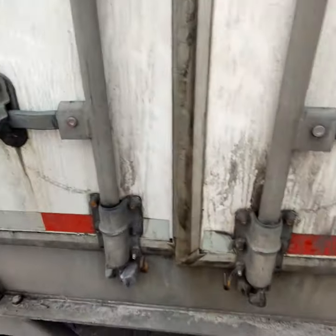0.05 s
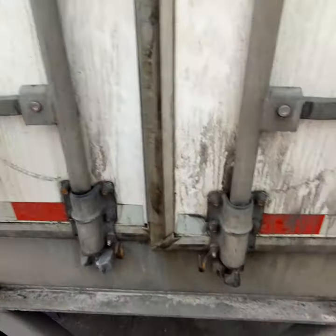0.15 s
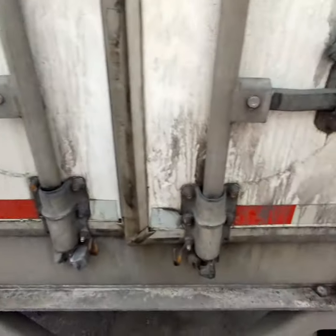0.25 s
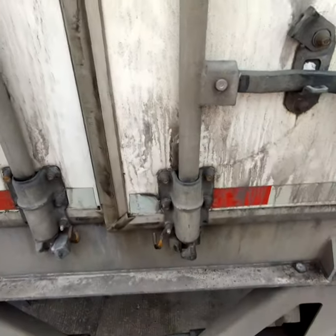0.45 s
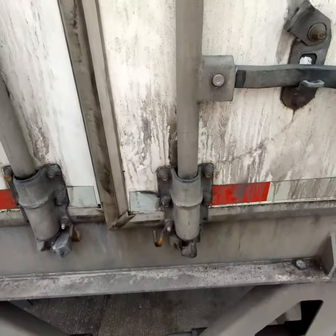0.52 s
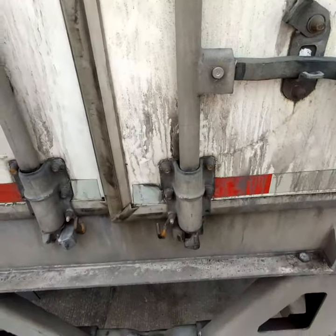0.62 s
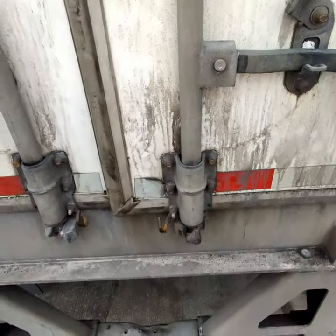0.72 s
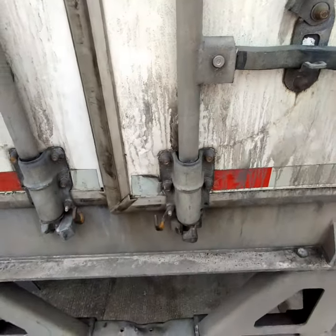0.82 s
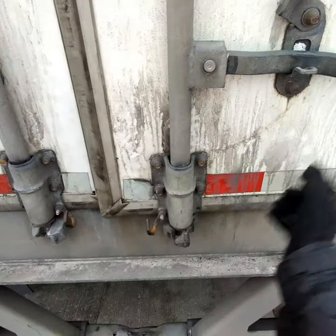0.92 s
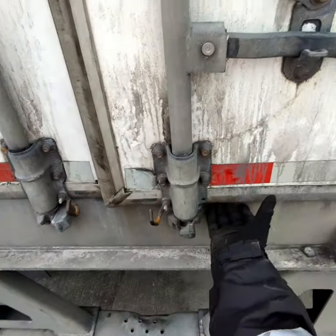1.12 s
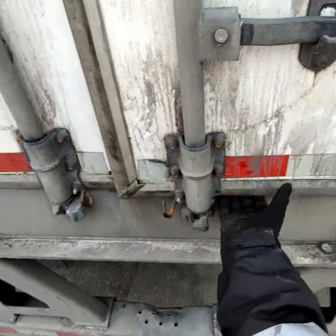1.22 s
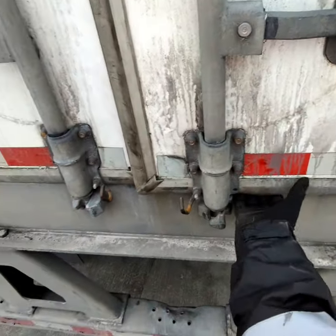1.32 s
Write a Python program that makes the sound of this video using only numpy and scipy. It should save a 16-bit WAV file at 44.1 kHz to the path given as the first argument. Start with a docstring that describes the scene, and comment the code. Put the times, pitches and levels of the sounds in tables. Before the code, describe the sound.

Steel latch hardware on a truck trailer door clanks and scrapes in two quick bursts outdoors

```python
"""Steel latch on a trailer door

Outdoors, close to a small two-port microphone, latch hardware on a trailer's rear door is knocked about.
Dull knocks ring low modes of the door and latch; clinks are short bursts of bright noise with a tone.
Dragging steel is a dense run of random clicks, and sparser clicks keep the door shuddering.
Filtered noise under it all makes the yard, the rustling jacket and a little wind.
"""
import sys
import numpy as np
from scipy import signal
from scipy.fft import rfft, irfft
from scipy.io import wavfile

SR = 44100
rng = np.random.default_rng(int(sys.argv[2]) if len(sys.argv) > 2 else 0)


def digitize_waveform(pressure):
    """Quantize a signal to 16-bit integers and store it at the path in sys.argv[1].

    Rows of a 2-D input are taken as channels; values are limited to [-1, 1].
    """
    field = np.atleast_2d(pressure).T
    bounded = np.clip(field, -1, 1)
    quanta = np.round(bounded * 32767).astype(np.int16)
    wavfile.write(sys.argv[1], SR, quanta)


def linear_from_db(decibels):
    """Turn decibels (scalar or array-like) into linear amplitude factors; 0 gives 1."""
    return 10 ** (np.asarray(decibels, float) / 20)


N = 59535
T = np.arange(N) / SR  # time of every sample [s]
HZ = np.maximum(np.fft.rfftfreq(N, 1 / SR), 1)  # frequency grid [Hz]

# In all tables, t60 is the time a ringing takes to fall by 60 dB.


def rms_one(x):
    """Scale to an average strength (rms) of 1."""
    return x / np.sqrt(np.mean(x ** 2) + 1e-20)


def level(curve):
    """Turn a table of times and levels into a gain for every sample."""
    return linear_from_db(np.interp(T, *np.transpose(curve)))


def at_hz(points, hz):
    """Read a table between its rows, on a log-frequency axis."""
    points = np.array(points)
    return np.interp(np.log(hz), np.log(points[:, 0]), points[:, 1])


def colour(x, spectrum):
    """Filter a sound by a spectrum table and scale it to rms 1."""
    return rms_one(irfft(rfft(x) * linear_from_db(at_hz(spectrum, HZ)), N))


def drift(corner_hz):
    """Slow random wandering of rms about 1: noise through two equal low-pass poles."""
    every = 40  # samples from one slow value to the next
    settle = 2000  # slow values thrown away while the filter settles
    r = np.exp(-2 * np.pi * corner_hz * every / SR)
    noise = rng.standard_normal(N // every + settle + 2)
    slow = rms_one(signal.lfilter([1], [1, -2 * r, r * r], noise)[settle:])
    return np.interp(np.arange(N) / every, np.arange(len(slow)), slow)


def fading(clicks, t60):
    """Each click starts a smooth exponential fade."""
    return signal.lfilter([1], [1, -linear_from_db(-60 / (t60 * SR))], clicks)


def ring(clicks, hz, t60):
    """A resonator: each unit click starts a dying sine of starting height 1."""
    r, w = linear_from_db(-60 / (t60 * SR)), 2 * np.pi * hz / SR
    return signal.lfilter([0, np.sin(w)], [1, -2 * r * np.cos(w), r * r], clicks + 1e-18)


def clicks_at(s, db):
    """Single-sample clicks at the given times and levels."""
    out = np.zeros(N)
    out[(np.atleast_1d(s) * SR).astype(int)] = linear_from_db(db)
    return out


def strike(s, db, modes):
    """Each blow sets all modes ringing, each mode with its own random strength."""
    strength_db = 0.8 * rng.standard_normal((len(s), len(modes)))
    out = np.zeros(N)
    for k, (hz, mode_db, t60) in enumerate(modes):
        out = out + ring(clicks_at(s, db + mode_db + strength_db[:, k]), hz, t60)
    return out


def grains(rate, spread_db):
    """Random clicks of either sign and uneven size, about rate of them per second."""
    happens = rng.random(N) < rate / SR
    sign = rng.choice([-1, 1], N)
    size = linear_from_db(spread_db * np.minimum(rng.exponential(1, N), 5))
    return happens * sign * size


def soften(x, hz):
    """A soft contact dulls a blow: two equal one-pole low-passes."""
    r = np.exp(-2 * np.pi * hz / SR)
    return signal.lfilter([(1 - r) ** 2], [1, -2 * r, r * r], x)


# how the two microphone ports differ: (frequency [Hz], left minus right [dB], left leads by [rad],
# likeness of diffuse sound in the two ports [0 to 1])
PORT_TABLE = [(100, 0, .09, .99), (700, 0, .02, .999), (1200, 0, 0, .99), (2000, -1.5, -.1, .88),
              (2600, -2, .2, .4), (3100, -1.5, 1.5, .4), (3900, -1.5, 2.6, .35), (4450, -6, 2.4, .1),
              (4900, -12, -1, .2), (5500, -11, -.5, .3), (6500, -1, -.2, .65), (7300, 4, -1.5, .5),
              (9500, 5, -1.1, .35), (11000, 10, -.7, .27), (12200, 17, -1.8, .1), (13000, 13, -3.1, .2),
              (14500, 9, -3, .2)]


def port(column):
    """One column of the port table, read on the frequency grid."""
    return at_hz(np.array(PORT_TABLE)[:, [0, column]], HZ)


def wind():
    """A little wind: lumpy low noise, made separately for each port."""
    sides = []
    for _ in "LR":
        low_noise = rms_one(soften(rng.standard_normal(N), 88))
        sides.append(linear_from_db(1.2 * drift(11.0)) * low_noise)
    return linear_from_db(-56) * np.array(sides)


# yard noise before its random drift: (time [s], level [dB])
YARD_LEVEL = [(0, -42), (.02, -53), (.11, -50.5), (.17, -45.5), (.22, -45.5), (.36, -62.5), (.55, -45.5),
              (.7, -50), (.87, -46), (.94, -48.5), (1.15, -48), (1.23, -48), (1.3, -46.5), (1.35, -46.5)]
# tone colour of the yard: (frequency [Hz], relative level per Hz [dB])
YARD_SPECTRUM = [(120, -3.5), (200, 0), (307, -6.5), (708, -4), (1120, -4), (1360, -6.5), (2170, -9.5),
                 (2350, -13.5), (3750, -20.5), (4500, -18), (5850, -39), (9900, -120)]


def yard():
    """The yard's background: filtered noise that swells and sinks."""
    return level(YARD_LEVEL) * linear_from_db(1.65 * drift(34)) * colour(rng.standard_normal(N), YARD_SPECTRUM)


# rubbing cloth before its random drift: (time [s], level [dB])
RUB_LEVEL = [(.55, -91), (.65, -54.5), (.87, -55), (.92, -73), (1.2, -60.5), (1.29, -48.5), (1.35, -48)]


def cloth_rub():
    """A rub of cloth: noise narrowed to a band near 1450 Hz by two resonators in a row."""
    noise = rng.standard_normal(N)
    for t60 in (1.7 / 240, 1.5 / 240):
        noise = ring(noise, 1450, t60)
    return level(RUB_LEVEL) * linear_from_db(2.6 * drift(17)) * rms_one(noise)


# jacket rustle before its random drift: (time [s], level [dB])
RUSTLE_LEVEL = [(0, -58.5), (.18, -57), (.36, -60), (.6, -58.5), (.72, -61), (.85, -55), (.95, -51),
                (1.07, -51.5), (1.13, -54), (1.19, -47.5), (1.24, -51), (1.29, -55.5), (1.35, -57)]
# tone colour of the rustle: (frequency [Hz], relative level per Hz [dB])
RUSTLE_SPECTRUM = [(1760, -46), (3000, -37), (3870, -16), (5350, -6.5), (5880, 0), (9110, 1), (12900, 7),
                   (14350, 5.5), (14550, -60)]


def jacket_rustle():
    """Jacket cloth rustles: bright filtered noise with a wandering level."""
    return level(RUSTLE_LEVEL) * linear_from_db(2.3 * drift(20)) * colour(rng.standard_normal(N), RUSTLE_SPECTRUM)


# tone colour of the sleeve swish: (frequency [Hz], relative level per Hz [dB])
SWISH_SPECTRUM = [(1760, -1), (3000, -7), (3940, -39), (4730, -8), (5200, -12), (5680, -10.5), (13000, -2),
                  (14350, -15), (14600, -70)]


def sleeve_swish():
    """One brisk swish of the sleeve: noise that swells and fades as a bell curve."""
    centre_s, half_s = 1.263, 0.023  # half_s: from the peak down to 1/e
    swell = np.exp(-((T - centre_s) / half_s) ** 2)
    return linear_from_db(-43) * swell * colour(rng.standard_normal(N), SWISH_SPECTRUM)


def background():
    """Yard and cloth sounds; two separate draws, mixed as mid and side, make the ports partly unlike."""
    def one():
        """One draw of all the background sounds."""
        return yard() + cloth_rub() + jacket_rustle() + sleeve_swish()

    likeness = port(3)
    mid = rfft(one()) * np.sqrt((1 + likeness) / 2)
    side = rfft(one()) * np.sqrt((1 - likeness) / 2)
    return irfft(np.array([mid + side, mid - side]), N)


# the door shuddering: (time [s], level [dB])
RUMBLE_LEVEL = [(0, -41.5), (.1, -42.5), (.17, -39), (.215, -36), (.26, -19), (.3, -32), (.33, -29.5),
                (.37, -36), (.4, -25.5), (.44, -31), (.49, -28.5), (.53, -20), (.58, -36.5), (.75, -36.5),
                (.9, -41), (1.0, -44.5), (1.08, -43.5), (1.15, -53), (1.24, -48.5), (1.29, -40),
                (1.35, -49)]
# tone colour of the shudder: (frequency [Hz], relative level per Hz [dB])
RUMBLE_SPECTRUM = [(15, -38), (25, 2), (81, 2.5), (105, -2), (181, -5.5), (367, -17.5), (425, -13),
                   (479, -33), (600, -17.5), (780, -87)]


def rumble():
    """Small uneven jolts, about 400 per second, keep the door panel shuddering."""
    return level(RUMBLE_LEVEL) * colour(grains(400, spread_db=2.0), RUMBLE_SPECTRUM)


# soft bumps of the door, before softening: (time [s], panel level [dB], bracket level [dB])
JOLT_TIMES = [(.399, -39, -28), (0.475, -22, -40), (0.544, -43, -25.5), (0.61, -20.5, -33.5),
              (0.646, -17.5, -64), (0.669, -19.5, -53), (0.696, -20, -44), (0.708, -23, -54),
              (0.755, -19.5, -49), (0.782, -13, -31), (0.804, -28, -56), (0.843, -19.5, -54),
              (1.031, -24, -47), (1.035, -51, -26.5), (1.045, -36, -28.5), (1.102, -26.5, -45),
              (1.282, -29, -63)]
# ringing of the door panel, also used by knocks(): (frequency [Hz], relative level [dB], t60 [s])
PANEL_RINGING = [(101, -13, 0.07), (168, -5, 0.036)]
# ringing of the bracket, also used by knocks(): (frequency [Hz], relative level [dB], t60 [s])
BRACKET_RINGING = [(228, -1, 0.05), (325, 1, 0.035), (428, -4, 0.035)]


def jolts():
    """Soft bumps that reach only the low modes of panel and bracket."""
    s, panel_db, bracket_db = np.transpose(JOLT_TIMES)
    bumps = strike(s, panel_db, PANEL_RINGING) + strike(s, bracket_db, BRACKET_RINGING)
    return soften(bumps, 333)


def scatter(x):
    """Nearby surfaces scatter mostly treble: short noisy echoes, opposite in the two ports."""
    tail_t60 = 0.016  # s
    tail = rng.standard_normal(N) * linear_from_db(-60 * T / tail_t60)
    tail = tail / np.sqrt(np.sum(tail ** 2))
    # the less alike the ports are at a frequency, the more is scattered
    side = irfft(rfft(x * drift(62)) * rfft(tail) * np.sqrt(1 - port(3)), N)
    return linear_from_db(-5) * side * [[1], [-1]]


# a small free part singing: (time struck [s], starting level [dB], time touched [s])
SING_TIMES = [(.2765, -41, 0.48), (.457, -47, 0.66)]


def sing():
    """A small free part gives a thin pure ring until a touch quickly damps it."""
    hz, t60, touch_s = 9362, 0.46, 0.008  # touch_s: fall to 1/e after the touch
    out = np.zeros(N)
    for struck, db, touched in SING_TIMES:
        damping = np.exp(-np.maximum(T - touched, 0) / touch_s)
        out = out + ring(clicks_at(struck, db), hz, t60) * damping
    return out


# steel dragging on steel, before its random drift: (time [s], level [dB])
DRAG_LEVEL = [(.22, -53), (.236, -30), (.247, -37), (.256, -34), (.268, -34), (.282, -34.5), (.30, -36),
              (.325, -40.5), (.35, -45.5), (.385, -49), (.40, -39.5), (.42, -33), (.44, -40.5),
              (.447, -28.5), (.46, -34), (.485, -35.5), (.51, -35), (.53, -41.5), (.57, -75)]
# tone colour of the dragging: (frequency [Hz], relative level per Hz [dB])
DRAG_SPECTRUM = [(180, -74), (300, -3.5), (1110, -10.5), (2300, -23.5), (3400, -26), (4250, -22.5),
                 (5350, -42), (8190, -28), (9490, -33), (13200, -27), (14400, -39), (14700, -80)]


def drag():
    """Sliding steel is gritty: about 7300 random clicks per second, filtered, with a wandering level."""
    grit = colour(grains(7300, spread_db=4.0), DRAG_SPECTRUM)
    return level(DRAG_LEVEL) * linear_from_db(3.4 * drift(43)) * grit


# clinks, bursts before softening: (time [s], burst level [dB], tone level [dB], tone frequency [Hz])
CLINK_TIMES = [(0.2347, -34, -29, 4700), (0.253, -59, -50, 6200), (0.275, -33.5, -31, 2220),
               (0.2891, -23, -21, 6050), (0.3082, -17, -20, 9550), (.4120, -40, -35, 11470),
               (0.4443, -28.5, -24.5, 9000), (0.4915, -29.5, -23.5, 6500), (0.507, -35, -19.5, 2500),
               (0.517, -27, -26, 4800)]
# tone colour of the bursts: (frequency [Hz], relative level per Hz [dB])
CLINK_SPECTRUM = [(1470, 1), (2500, 11.5), (3390, -15), (4820, 6), (5450, -3), (6390, 2.5), (8550, 0),
                  (9660, 3), (13300, -3.5), (14400, -12), (15500, -38)]
# loose steel parts set ringing: (time [s], starting level [dB], frequency [Hz], t60 [s])
LOOSE_RINGS = [(.2548, -36, 8370, 0.069), (.2560, -28, 2110, 0.037), (.312, -47, 5060, 0.038),
               (.4440, -23, 1298, 0.039), (0.459, -47, 4260, 0.056), (0.8938, -31, 3240, 0.0026)]


def clinks():
    """Steel on steel: a dying burst of bright noise with one short tone; loose parts also ring."""
    burst_t60, tone_t60, rise_s = 0.021, 0.01, 0.000049
    s, burst_db = np.transpose(CLINK_TIMES)[:2]
    burst = soften(fading(clicks_at(s, burst_db), burst_t60), 1 / (2 * np.pi * rise_s))
    out = burst * colour(rng.standard_normal(N), CLINK_SPECTRUM)
    for start, _, tone_db, hz in CLINK_TIMES:
        out = out + ring(clicks_at(start, tone_db), hz, tone_t60)
    for start, db, hz, t60 in LOOSE_RINGS:
        out = out + ring(clicks_at(start, db), hz, t60)
    return out


# blows into the door, before softening: (time [s], door panel level [dB], bracket level [dB],
# bar level [dB], hard edge level [dB])
KNOCK_TIMES = [(0.197, -13, -48, -37.5, -67), (0.2332, -16, -18.5, -10.5, -21.5),
               (0.2589, -24, -35, -16.5, -37), (0.2752, -29, -46, -26, -39), (0.2921, -15, -23.5, -22, -52),
               (0.3080, -11.5, -19, -3, -19.5), (0.3095, -31, -46, -10, -32.5),
               (0.389, -30, -28.5, -28, -63), (0.4106, -38, -20.5, -23, -46),
               (0.412, -24, -13.5, -13.5, -27), (0.4182, -37, -26, -56, -40.5),
               (0.4433, -28, -30, -25.5, -42), (0.4476, -26, -45, -33, -35.5), (0.4945, -37, -23, -16, -59),
               (.5060, -21, -27, -25, -30.5), (0.5171, -18.5, -18.5, -8.5, -31.5),
               (0.5201, -34, -24.5, -15, -40.5), (0.5358, -41, -25, -33, -55),
               (0.7658, -32, -24.5, -20.5, -44.5), (.9020, -45, -41, -41, -50)]
# ringing of the bar: (frequency [Hz], relative level [dB], t60 [s])
BAR_RINGING = [(612, -2, 0.022), (705, 3, 0.024), (805, -7, 0.016)]
# ringing set off by the hard edge: (frequency [Hz], relative level [dB], t60 [s])
EDGE_RINGING = [(1062, 4, 0.027), (1570, -5, 0.03), (1813, 0, 0.018), (2100, -9.5, 0.013),
                (2355, -4, 0.014), (2500, -12, 0.0064), (2810, -22, 0.004)]


def knocks():
    """Dull, softened blows ring panel, bracket and bar; a hard edge chatters and rings higher modes."""
    low_lead_s = 0.00047  # low modes start slightly early, because softening and the low cut delay them
    contact_hz = 920
    s, panel_db, bracket_db, bar_db, edge_db = np.transpose(KNOCK_TIMES)
    dull = strike(s - low_lead_s, panel_db, PANEL_RINGING)
    dull = dull + strike(s - low_lead_s / 2, bracket_db, BRACKET_RINGING)
    dull = dull + strike(s, bar_db, BAR_RINGING)
    out = soften(soften(dull, contact_hz), 1.66 * contact_hz)
    # the edge does not land cleanly: small random clicks die away after the first one
    landing = clicks_at(s, edge_db)
    chatter = 0.15 * fading(landing, 0.012) * rms_one(grains(3500, spread_db=1.5))
    edge = landing + linear_from_db(-0.5) * chatter
    for k, (hz, db, t60) in enumerate(EDGE_RINGING):
        out = out + (-1) ** k * linear_from_db(db) * ring(edge, hz, t60)  # neighbours start in opposite directions
    return out


# echoes from the ground and the door: (delay [s], level [dB])
NEAR_ECHOES = [(.006, -31), (0.009, -18.5), (0.018, -24)]


def scene():
    """Latch sounds with a few near echoes, over the door's shudder and the background."""
    direct = knocks() + clinks() + drag()
    latch = direct + sum(linear_from_db(db) * np.roll(direct, int(s * SR)) for s, db in NEAR_ECHOES)
    return latch + scatter(latch) + sing() + jolts() + rumble() + background() + wind()


def ports(x):
    """The two ports hear each frequency with unequal level and timing, at the same total power."""
    left = linear_from_db(port(1) / 2) * np.exp(0.5j * port(2))  # half the difference goes to each side
    right = 1 / left
    power = (abs(left) ** 2 + abs(right) ** 2) / 2
    return irfft(rfft(x) * np.array([left, right]) / np.sqrt(power), N)


def low_pass(x):
    """Removes everything above the highest recorded frequency."""
    return signal.sosfilt(signal.butter(12, 15670, fs=SR, output="sos"), x)


def record(dry):
    """Port differences, low cut, high cut and an input stage that gently rounds the peaks."""
    low_cut = signal.butter(3, 95.8, "high", fs=SR, output="sos")
    high_cut = signal.butter(10, 15200, fs=SR, output="sos")
    x = signal.sosfilt(low_cut, ports(dry))
    x = signal.sosfilt(high_cut, x)
    ceiling = 1.05  # height the rounded peaks approach
    x = ceiling * np.tanh(x / ceiling)
    return low_pass(x)


dry = scene()
out = record(dry)
digitize_waveform(out)
```